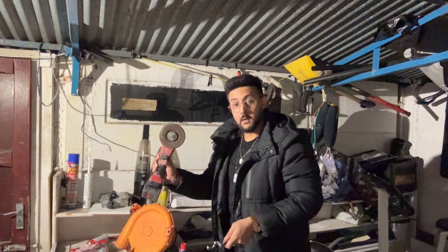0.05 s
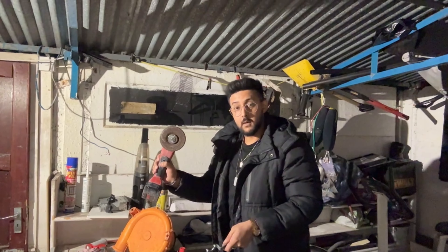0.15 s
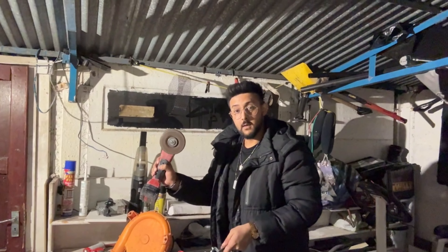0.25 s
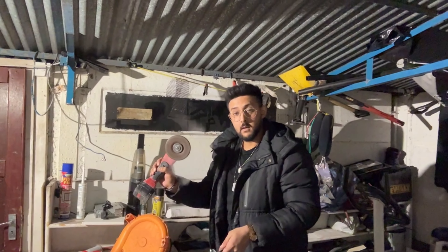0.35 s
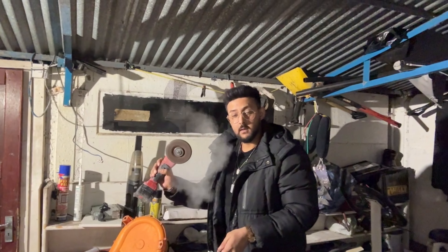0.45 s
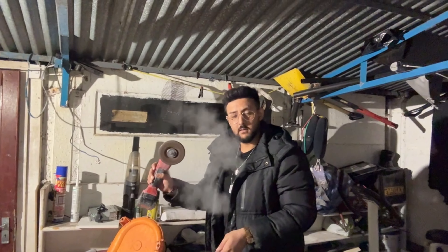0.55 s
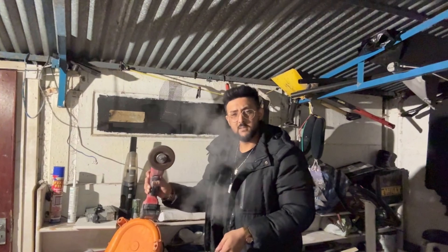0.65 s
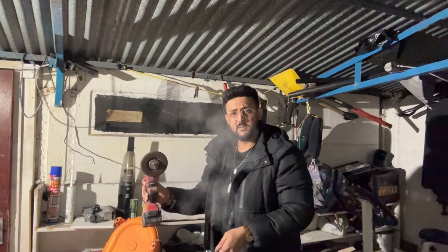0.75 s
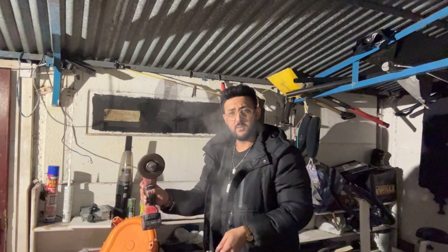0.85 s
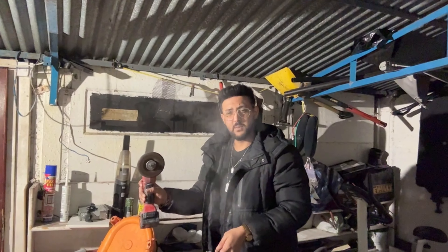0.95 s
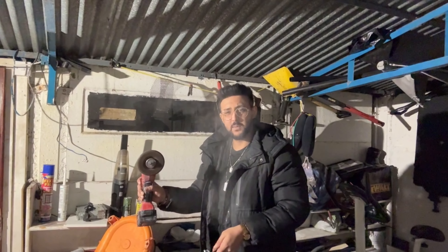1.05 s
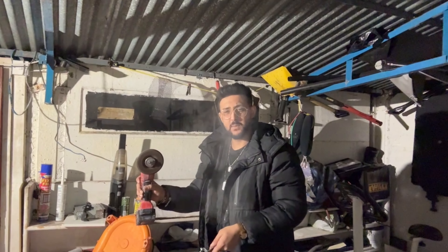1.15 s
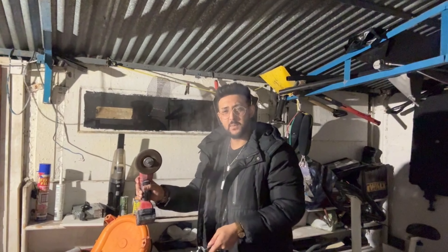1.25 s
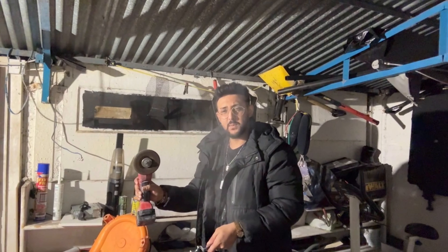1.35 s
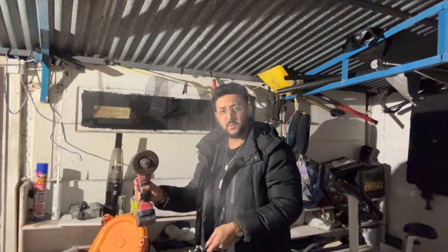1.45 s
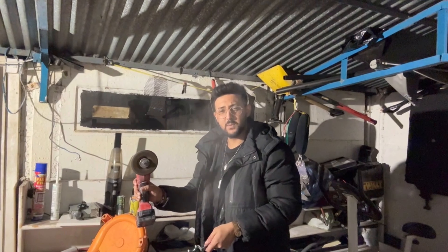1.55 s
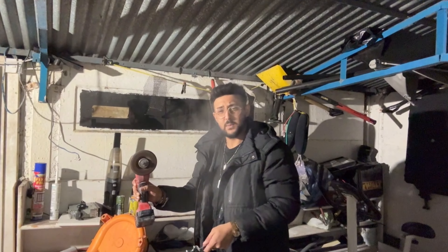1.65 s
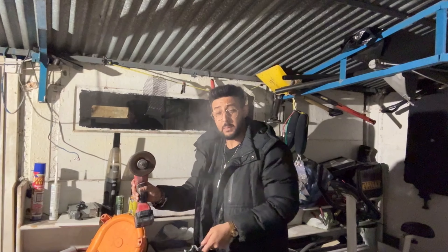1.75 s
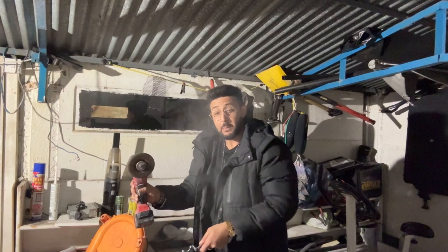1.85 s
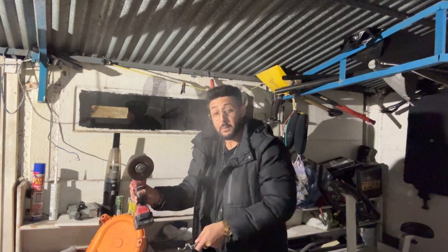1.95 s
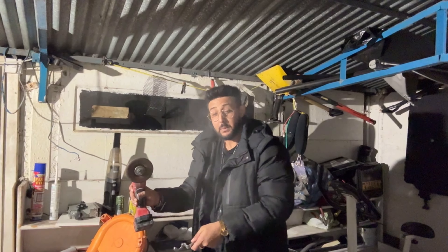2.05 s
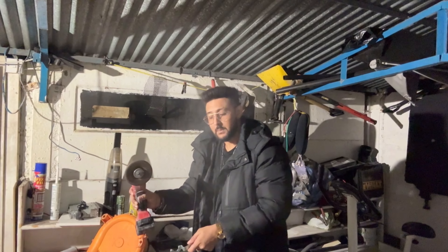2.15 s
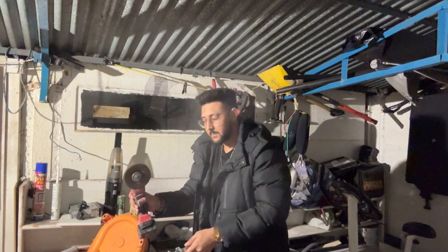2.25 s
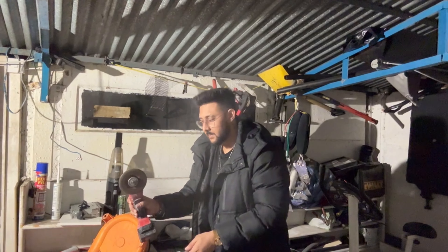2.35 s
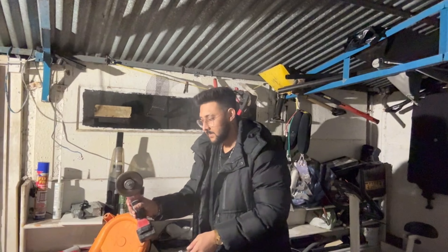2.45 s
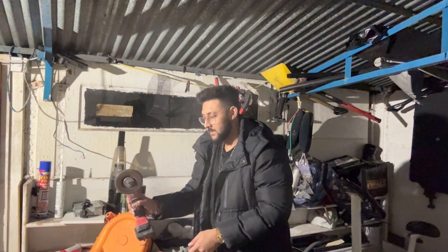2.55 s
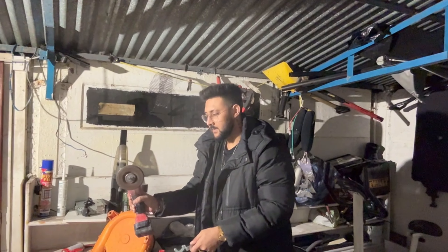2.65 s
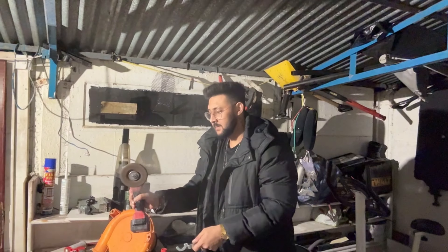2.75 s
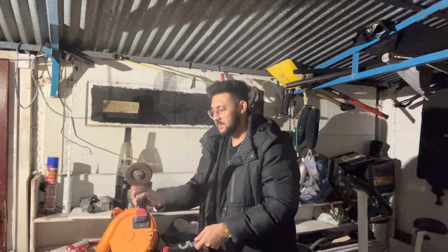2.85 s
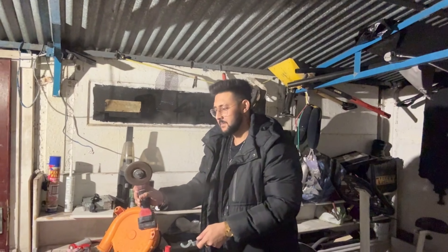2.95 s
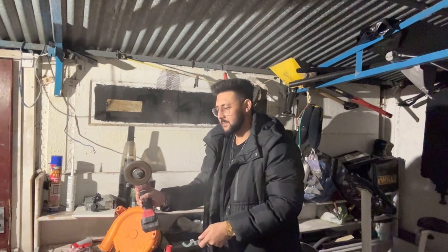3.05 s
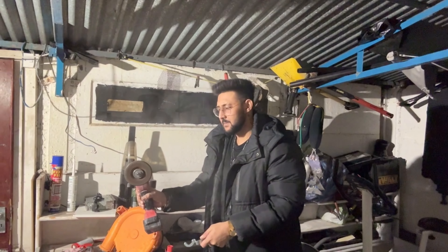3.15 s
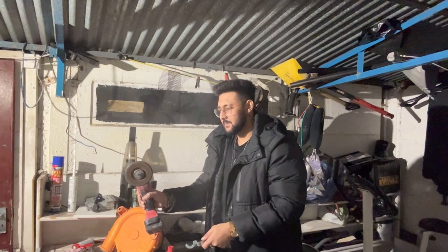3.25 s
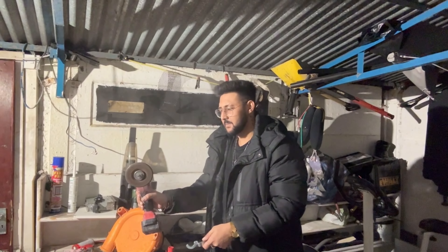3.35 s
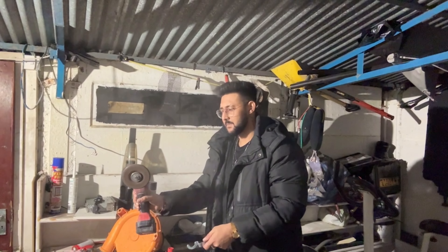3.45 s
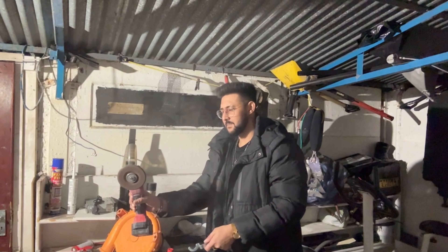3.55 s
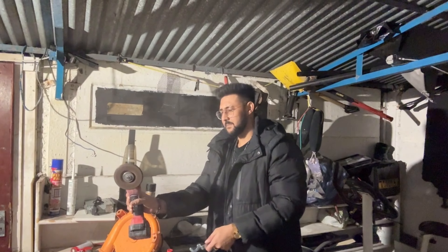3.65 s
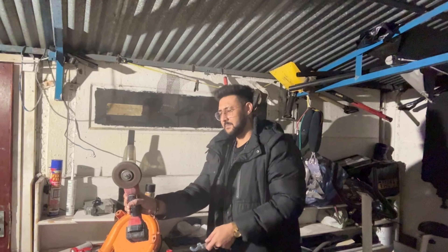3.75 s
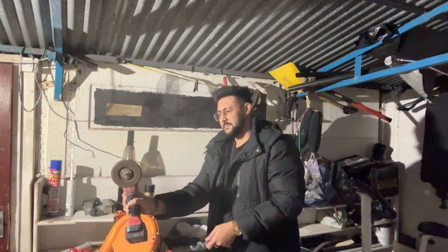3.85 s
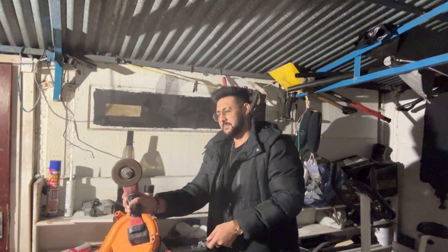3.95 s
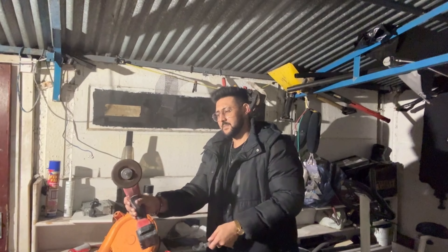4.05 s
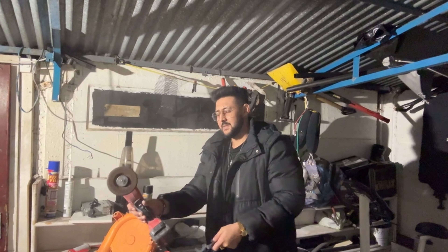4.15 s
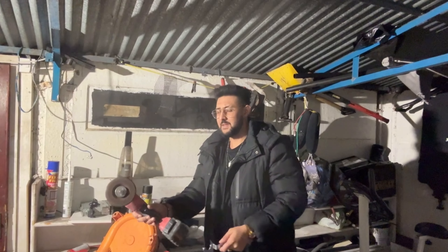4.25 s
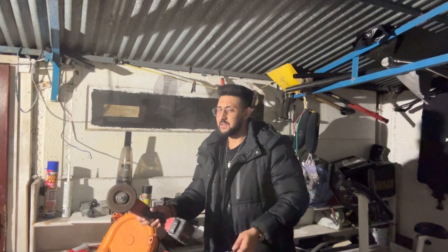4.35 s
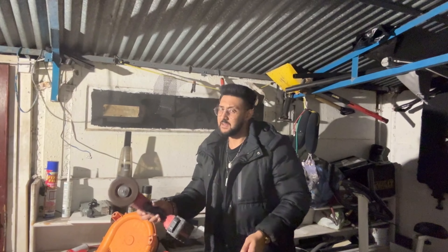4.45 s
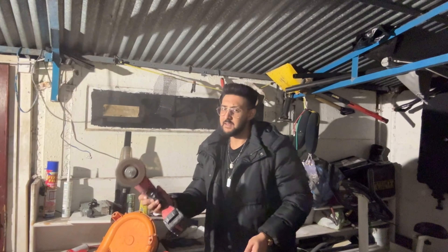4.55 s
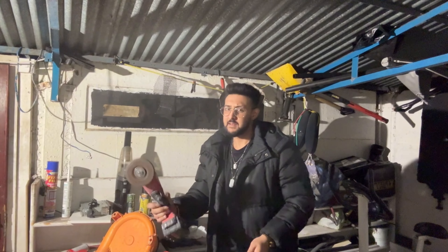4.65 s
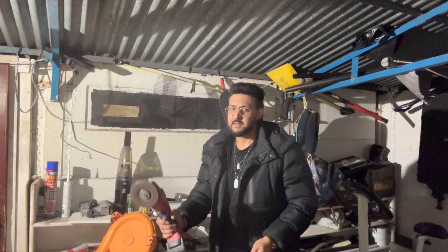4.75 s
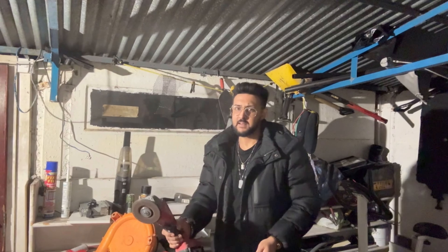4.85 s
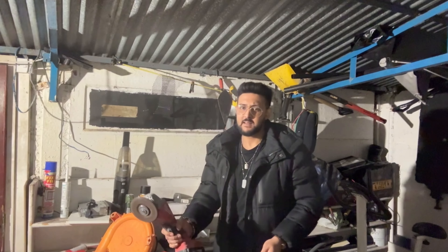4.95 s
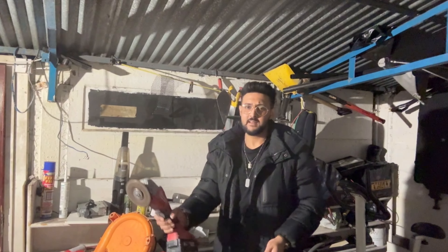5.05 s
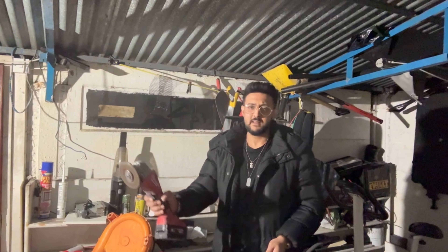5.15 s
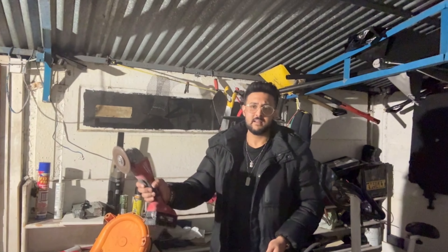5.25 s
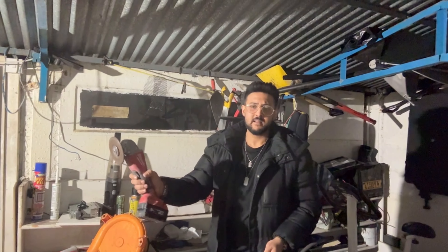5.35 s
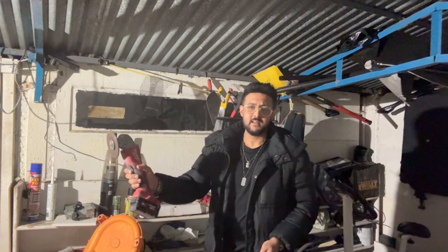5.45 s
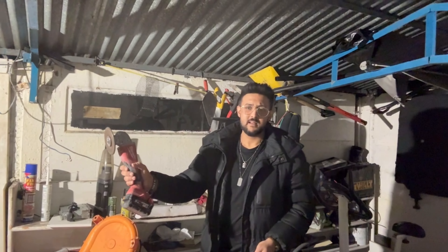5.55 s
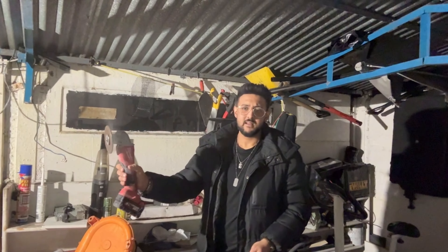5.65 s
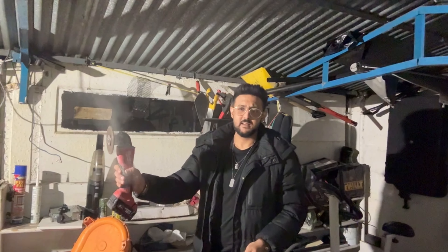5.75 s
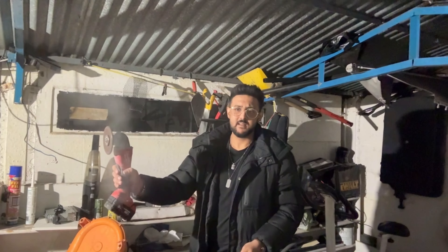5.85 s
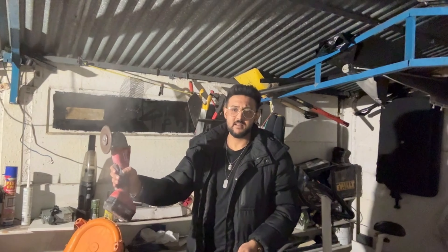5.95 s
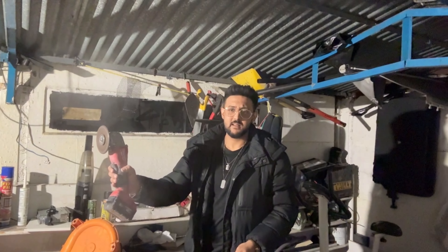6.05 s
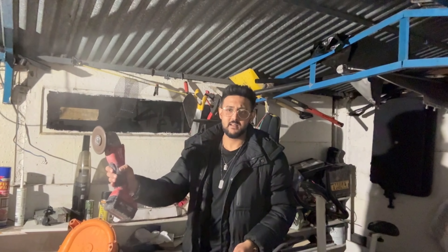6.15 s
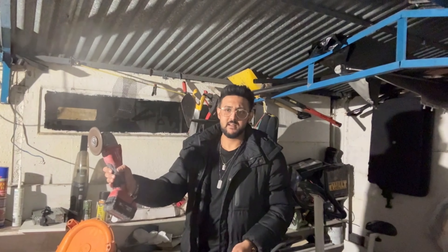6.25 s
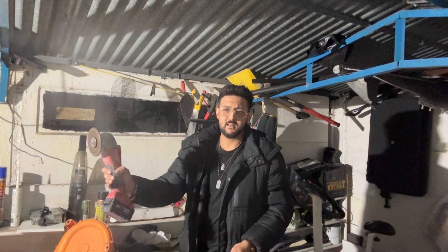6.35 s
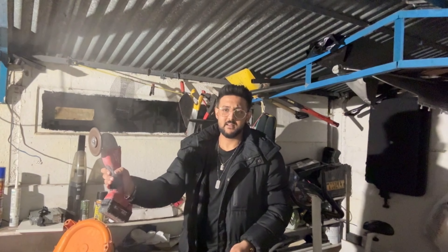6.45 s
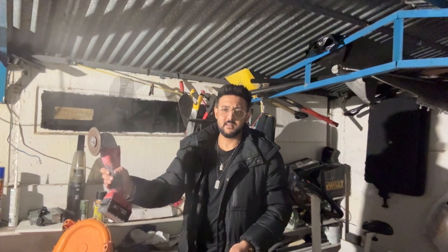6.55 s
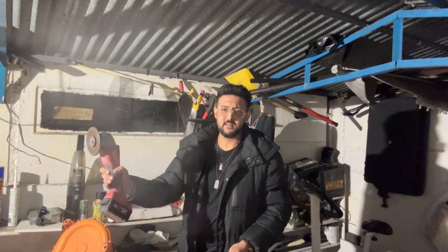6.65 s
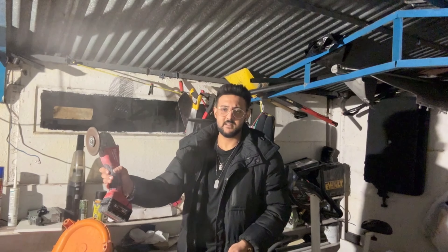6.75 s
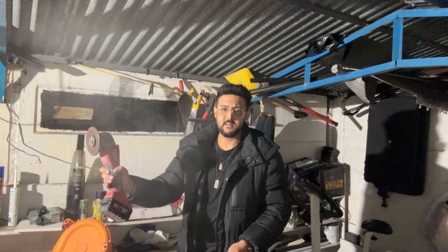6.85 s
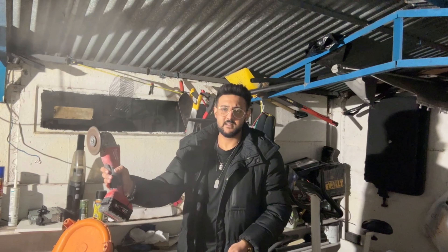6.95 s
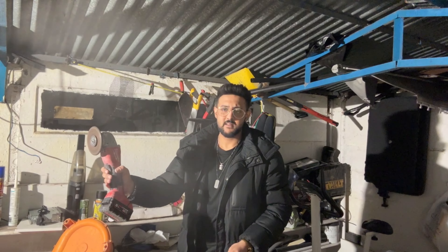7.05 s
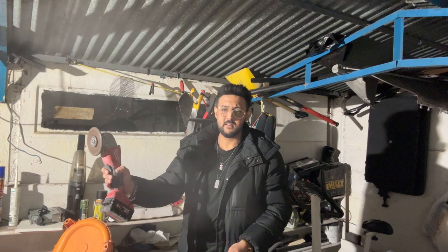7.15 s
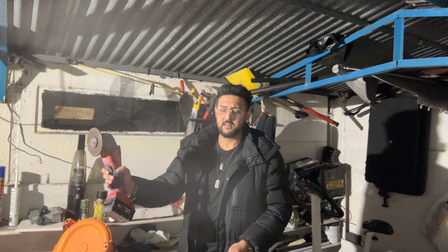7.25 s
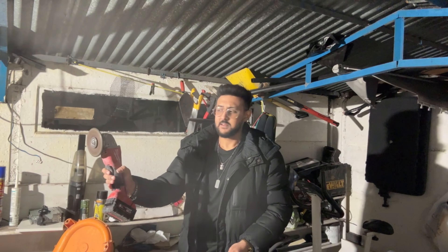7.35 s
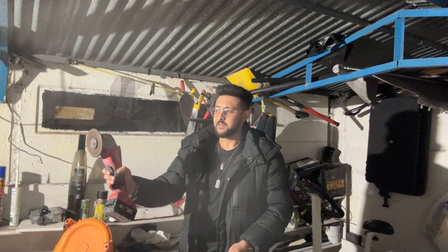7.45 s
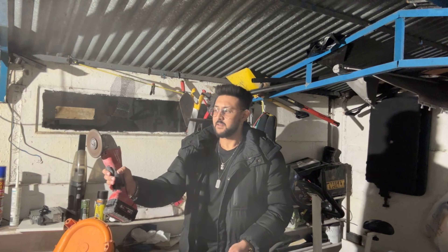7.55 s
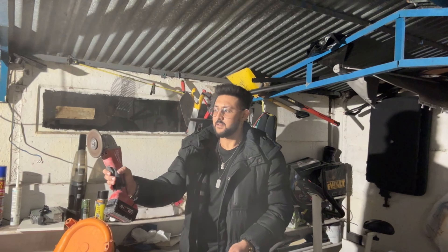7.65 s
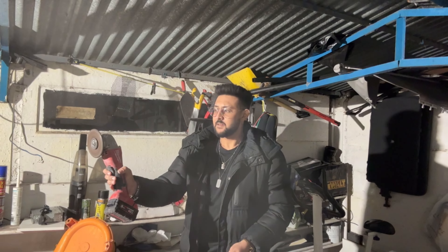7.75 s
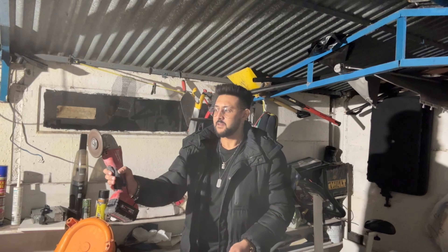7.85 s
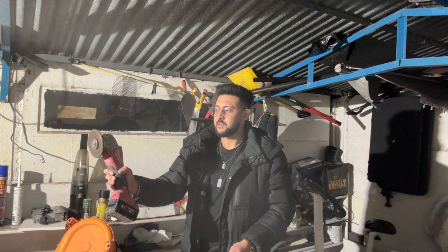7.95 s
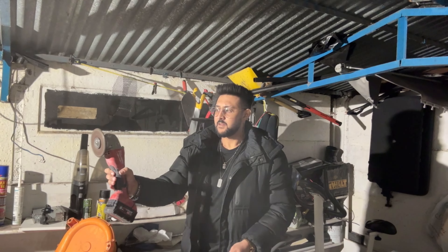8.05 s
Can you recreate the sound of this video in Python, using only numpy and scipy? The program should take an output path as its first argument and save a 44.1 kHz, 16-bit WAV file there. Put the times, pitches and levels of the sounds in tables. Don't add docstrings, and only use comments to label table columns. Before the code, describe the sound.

A quiet garage with low rumble; at 0.1 s a finger rubs faintly on plastic and a trigger gives way. At 0.2 s a cordless angle grinder growls and whirs up in a fraction of a second, gears whining roughly. From 0.4 to 2.6 s it coasts, pitch slowly sinking, with bright fluttering rattle, irregular hard metallic knocks, disc ringing, fan wind and gritty brush hiss; thin motor tones swell and fade. Short pulls at 2.6 and 3.2 s raise the whine again, the second higher, each followed by rattling rundown. A long coast sinks quieter until 5.5 s, when a stronger pull surges to 5.9 s. From 6.2 to 7 s comes the longest, fastest pull, high and steady, then a smoother, hissing coast. A last quick surge begins at 7.9 s and is still running at the end, around 8.1 s. Short hard-walled echo, fairly close microphone, no cutting.

```python
import sys
import numpy as np
from scipy import signal
from scipy.fft import rfft, irfft, next_fast_len
from scipy.io import wavfile

SR = 44100
rng = np.random.default_rng(int(sys.argv[2]) if len(sys.argv) > 2 else 0)


def makeup_ratio(level_db):
    decades = np.asarray(level_db, float) / 20
    return 10 ** decades


def wrap_up_sound(samples):
    columns = np.atleast_2d(samples).T
    tamed = np.clip(columns, -1, 1)
    steps = np.round(tamed * 32767).astype(np.int16)
    wavfile.write(sys.argv[1], SR, steps)


N = 356475
T = np.arange(N) / SR

DISC_RATIO, TEETH, POLES = .375, 10, 8
START_S = .195
UPRIGHT_S = 5.5
ENGAGE_S = 0.025


def evened(x):
    return x / np.sqrt(np.mean(x ** 2) + 1e-20)


def curve(rows, column=1):
    columns = np.transpose(rows)
    return np.interp(T, columns[0], columns[column])


def read(points, hz):
    f, value = np.transpose(points)
    return np.interp(np.log(hz + 1), np.log(f + 1), value)


def colour(x, points):
    size = next_fast_len(N)
    gain = makeup_ratio(read(points, np.fft.rfftfreq(size, 1 / SR)))
    return evened(irfft(rfft(x, size) * gain, size)[:N])


def wander(hz):
    return evened(signal.lfilter(*signal.butter(2, hz, fs=SR), rng.standard_normal(N)))


def lag(x, s):
    keep = np.exp(-1 / (s * SR))
    return signal.lfilter([1 - keep], [1, -keep], x)


def resonate(x, hz, width):
    r = np.exp(-np.pi * width / SR)
    angle = 2 * np.pi * hz / SR
    return signal.lfilter([1 - r * r], [1, -2 * r * np.cos(angle), r * r], x) * np.sin(angle)


def ring_modes(x, modes, widen=1):
    return sum(makeup_ratio(db) * evened(resonate(resonate(x, f, width), f, widen * width)) for f, width, db in modes)


def noise_db(hz, drive, push, full_db, per_doubling_db, drive_db, push_db):
    return full_db + per_doubling_db * np.log2(hz / 350) + drive_db * drive + push_db * push


# (frequency [Hz], level [dB per Hz])
RUMBLE_COLOUR = [(15, -34), (25, 7), (111, -5), (137, -12), (263, -25), (1130, -27), (1370, -28),
                 (1480, -29), (1790, -29), (4870, -43), (5880, -33), (13600, -46), (16000, -47)]
# (time [s], level [dB])
RUMBLE_LEVEL = [(0.18, -43.5), (0.31, -50.5), (2.5, -47), (4.5, -52), (8.08, -54)]


def room_rumble():
    return makeup_ratio(curve(RUMBLE_LEVEL)) * colour(rng.standard_normal(N), RUMBLE_COLOUR)


# (time [s], peak level [dB])
FINGER = [
    (.099, -42.5),
    (.12, -54),
    (.145, -59),
    (0.194, -35),
]


def finger_rub():
    rub = sum(makeup_ratio(db) * (T > s) * np.exp(-np.maximum(T - s, 0) / 0.024) for s, db in FINGER)
    noise = rng.standard_normal(N)
    plastic = resonate(resonate(noise, 3100, 1200), 2800, 1200) + 0.48 * resonate(noise, 4200, 900)
    return 2.4 * rub * plastic


def garage(x, t60=0.2):
    at = np.arange(250, SR // 2 - 20, 20)
    taps = np.zeros(SR // 2)
    taps[at + rng.integers(0, 20, len(at))] = rng.choice([-1., 1.], len(at)) * makeup_ratio(-60 * at / SR / t60)
    taps = signal.lfilter([1], [1, -.5], taps)
    return signal.oaconvolve(x, taps / np.linalg.norm(taps))[:N]


# (on [s], off [s], shaft speed aimed at [Hz], spin-up time [s], softness of the start [power])
PULLS = [
    (.195, .41, 294.5, .103, 2.0),
    (2.632, 2.85, 334, .105, 1.8),
    (3.245, 3.485, 378.6, .118, 1.7),
    (5.515, 5.914, 387, .137, 1.46),
    (6.23, 6.985, 419, .2, 1.08),
    (7.93, 8.2, 357.5, .071, 1.81),
]


def trigger():
    drag_per_s, friction_hz = .336, 68.8
    hz, aim = np.full(N, 30.0), np.ones(N)
    drive = np.zeros(N)
    for on, off, top_hz, rise, soft in PULLS:
        since, first = np.clip(T - on, 0, off - on), hz[round(on * SR)]
        driven = top_hz - (top_hz - first) * np.exp(-(since / rise) ** soft)
        slowing = np.exp(-drag_per_s * np.maximum(T - off, 0))
        coasting = (driven + friction_hz) * slowing - friction_hz
        hz, aim = np.where(T > on, coasting, hz), np.where(T > on, top_hz, aim)
        drive += np.clip((T - on) / 0.006, 0, 1) * np.exp(-np.maximum(T - off, 0) / .012)
    push = drive * np.clip(1 - hz / aim, 0, 1)
    return hz, drive, push


def chatter(turns):
    disc = DISC_RATIO * turns + .12 * wander(40)
    new_turn = np.diff(np.floor(np.maximum.accumulate(disc)), prepend=0) > 0
    hits = new_turn * makeup_ratio(4.3 * np.minimum(rng.exponential(1, N), 2.5))
    hits += (rng.random(N) < 150 / SR) * makeup_ratio(2.9 * np.minimum(rng.exponential(1, N), 3) - 5.0)
    t = np.arange(600) / SR
    burst = (1 - np.exp(-t / .0003)) * np.exp(-t / .0022)
    return evened(signal.oaconvolve(hits, burst)[:N])


# (frequency [Hz], level [dB per Hz])
AIR = [(88, -45), (150, -31), (205, -38), (304, -8), (375, -4), (407, 0.5), (446, -8.5), (662, -2),
       (1410, 2.5), (1640, 2), (2400, -0.5), (3120, -24), (5280, -120)]
# (frequency [Hz], width [Hz], level [dB])
VENTS = [(329.6, 39.6, -18.5), (524.5, 37, -13), (684, 37, -12.5)]
# (time [s], turned to the listener [dB], gear slack [dB])
HOLD = [(.2, 3, 6.5), (.5, 0.5, -2.5), (.85, 4, 0.5), (1.3, 4, 2.5), (1.8, 2.5, 4.5), (2.0, 3.5, 2.5),
        (2.6, 2, 2.5), (3.0, 2, -1), (3.4, 3.5, -2), (3.9, 2, -1), (4.5, -0.5, -0.5), (5.0, -1, -2.5),
        (5.5, -0.5, -1.5), (5.7, 2.5, -1.5), (6.2, 2, 0), (7.0, 1.5, -5), (7.4, 0, -1.5), (8.08, 0, -1.5)]


def fan_wind(hz, drive, push):
    gust = rng.standard_normal(N)
    wind = colour(gust, AIR) + ring_modes(gust, VENTS)
    level = noise_db(hz, drive, push, full_db=-35.5, per_doubling_db=7, drive_db=0, push_db=-1.5)
    return wind * makeup_ratio(level + 0.96 * curve(HOLD) + 1.0 * wander(17))


# (frequency [Hz], level [dB per Hz])
HISS = [(880, -27), (1500, -15), (1640, 0.5), (2250, -8.5), (2460, 1), (3010, 2), (4010, 2.5), (6080, 5),
        (6920, -9.5), (8790, -4.5), (10200, -3.5), (14200, -8), (15500, -12), (16100, 0)]


def brush_hiss(turns, hz, drive, push):
    grit = rng.standard_normal(N) * (3.0 + chatter(turns))
    level = noise_db(hz, drive, push * drive, full_db=-27.5, per_doubling_db=3.5, drive_db=2.5, push_db=11.5)
    return colour(grit, HISS) * makeup_ratio(level + curve(HOLD) + 1.5 + 1.0 * wander(15.0))


# (frequency [Hz], width [Hz], level [dB])
DISC = [(1782, 28, -9), (1853, 75, 2.5), (1981, 74, 15), (2117, 28, 8.5), (2593, 26, 3.5), (2844, 21, -4.5),
        (3750, 100, 9), (6200, 210, 3.5)]


def disc_ring(shake, hz, pressed, push, slack_db):
    ring = evened(sum(makeup_ratio(db) * evened(resonate(shake, f, width)) for f, width, db in DISC))
    ring = signal.sosfilt(signal.butter(4, 1500, "high", fs=SR, output="sos"), ring)
    level = noise_db(hz, pressed, push, full_db=-30.5, per_doubling_db=1, drive_db=-7.5, push_db=12)
    hold_db = 0.77 * slack_db + 0.2 * curve(HOLD) - 1.04 * (T > UPRIGHT_S)
    return ring * makeup_ratio(level + hold_db + 1.47 * wander(9.6))


# (frequency [Hz], level [dB per Hz])
RATTLE = [(4120, -27.5), (7000, -16), (7480, -53), (9340, 0), (9700, -9), (10100, 2), (11100, -9),
          (11800, -10.5), (14100, -13), (15600, -59), (16200, -36)]
# (frequency [Hz], width [Hz], level [dB])
CASE = [(8950, 780, -10), (9890, 210, 2), (10430, 420, -1.5), (12700, 160, -19), (13650, 250, -22)]


def case_rattle(shake, hz, pressed, push, slack_db):
    rattle = evened(colour(shake, RATTLE) + makeup_ratio(-6.5) * evened(ring_modes(shake, CASE, widen=3)))
    level = noise_db(hz, pressed, push, full_db=-23, per_doubling_db=5.5, drive_db=-9.5, push_db=0)
    return rattle * makeup_ratio(level + slack_db + 1.0 * wander(2.2) + 0.5)


# (time [s], peak level [dB])
KNOCKS = [(0.6023, -8), (0.7257, -20), (0.8388, -7), (0.849, -3), (0.883, -4.5), (0.972, -15),
          (1.0056, -6.5), (1.064, -10), (1.198, -5.5), (1.2618, -6), (1.3134, -3.5), (1.5364, -7),
          (1.752, -4.5), (1.8337, -6), (1.852, -7), (1.937, -13), (2.16, -8), (2.413, -12), (2.8378, -2),
          (2.9924, -6), (3.1826, -5), (3.2101, -4.5), (3.5134, -12), (3.5866, -7), (3.6675, -14),
          (3.7216, -7), (3.7847, -5), (4.2103, -9)]


def tooth_knocks(drive):
    t, knocks = np.arange(500) / SR, np.zeros(N)
    shape = (1 - np.exp(-t / 0.0003)) * np.exp(-t / 0.0014)
    blows = list(KNOCKS)
    for place, strength in rng.random((44, 2)):
        s = .5 + 2.2 * place
        blows.append((s, -14 + 4 * strength - 30 * drive[round(s * SR)]))
    for (s, db), (*pitch, share) in zip(blows, rng.uniform(0.93, 1.03, (len(blows), 5))):
        low_db = -13 + 300 * (share - 1)
        mode_hz = (.6 + .4 * np.array(pitch)) * [9930, 10480, 13200, 2180]
        clang = [1, .35, .15, makeup_ratio(low_db)] @ np.sin(2 * np.pi * np.outer(mode_hz, t))
        knocks[round(s * SR):][:500] += makeup_ratio(db) * shape * clang
    return 1.6 * knocks


def loose_gears(turns, hz, drive, push):
    closed = lag(drive, 0.45)
    slack_db = curve(HOLD, 2) + 2.5 * np.maximum(closed - drive, 0)
    loose = np.interp(T, [UPRIGHT_S - .1, UPRIGHT_S + 0.08], [.8, .4])
    shake = rng.standard_normal(N) * (0.78 + loose * chatter(turns))
    state = shake, hz, closed * drive, push, slack_db
    return case_rattle(*state) + disc_ring(*state) + tooth_knocks(drive)


def order_tone(order, turns):
    return np.sqrt(2) * np.cos(2 * np.pi * order * turns)


# (frequency [Hz], level [dB])
HOUSING = [(40, -8), (150, -15.5), (230, -31.5), (330, -4.5), (450, -5), (560, -0.5), (850, -7), (1050, -1),
           (1700, -8)]
ORDERS = [.375, 1, 2, 3, 4]
ORDER_LEVELS = [-50, -52, -52, -58, -48]


def shaft_tones(turns, hz):
    out = np.zeros(N)
    for k, db in zip(ORDERS, ORDER_LEVELS):
        out += makeup_ratio(db + 2.5 * wander(10) + read(HOUSING, k * hz)) * order_tone(k, turns + rng.random() / k)
    return out * np.clip(hz / 220, 0, 1) * (T > START_S) * makeup_ratio(1.03 * curve(HOLD))


# (on [s], off [s], multiple of shaft speed [ratio], level [dB])
GLEAMS = [(1.76, 1.97, 20, -36), (2.03, 2.63, 12, -47), (2.2, 2.64, 28, -40), (4.2, 4.5, 10.6, -41),
          (4.55, 4.85, 16, -41), (7.07, 7.14, 8, -35), (5.15, 5.42, 16, -41), (1.05, 1.48, 16, -38),
          (5.9, 6.03, 8, -37), (3.48, 3.64, 8, -41), (.55, 1.1, 4, -45), (1.5, 1.8, 4, -48),
          (6.45, 7.05, 1, -51), (.45, .9, 2, -50), (3.25, 3.75, 2, -48), (3.6, 4.5, 4, -49)]


def gleams(turns):
    out = np.zeros(N)
    for on, off, k, db in GLEAMS:
        swell = np.clip(np.minimum(T - on, off - T) / 0.013, 0, 1)
        out += swell * makeup_ratio(db + 4 + 3.3 * wander(33)) * np.cos(2 * np.pi * k * turns)
    return out


# (frequency [Hz], level [dB])
HUM = [(900, -67.5), (1600, -64), (2000, -17.5), (2280, -34), (2650, -32), (2970, -20), (3150, -22),
       (3320, -29.5)]
# (frequency [Hz], level [dB])
OCTAVE = [(1400, -66), (2050, -75), (2650, -49), (3000, -19.5), (3250, -15.5), (3550, -24), (3900, -48),
          (4600, -56)]


def magnet_hum(turns, hz, drive, idle):
    hum_db = read(HUM, POLES * hz) - 23 * idle + 1.2 * wander(20)
    octave_db = read(OCTAVE, 2 * POLES * hz) - 18 * idle + 2.4 * wander(21)
    octave = order_tone(2 * POLES, turns + .004 * drive * wander(150))
    return makeup_ratio(hum_db) * order_tone(POLES, turns) + makeup_ratio(octave_db) * octave


def switching(push):
    return makeup_ratio(-45) * push ** 3 * np.cos(2 * np.pi * 8050 * T)


# (frequency [Hz], width [Hz], level [dB])
GEARBOX = [(1156, 28, -25), (2030, 270, -31.5), (3140, 500, 0), (5980, 460, 4), (6660, 510, 2)]
# (shaft speed [Hz], level [dB])
GRIND = [(32, -33), (43, -19), (110, -20), (200, -27.5), (250, -33), (320, -30), (390, -47)]


def tooth_grind(wobble, throb, hz, drive):
    overtones = order_tone(2 * TEETH, wobble) + 0.93 * order_tone(3 * TEETH, wobble)
    grind = rng.standard_normal(N) + 2.3 * overtones
    return evened(ring_modes(grind, GEARBOX)) * throb * makeup_ratio(read(GRIND, hz)) * drive


# (frequency [Hz], level [dB])
MESH = [(700, -60), (1030, -31), (1300, -32.5), (2000, -20), (2500, -21), (3100, -25), (3600, -22),
        (4050, -23)]


def mesh_whine(wobble, throb, hz, drive, push, idle):
    upright_db = -4 * (T > UPRIGHT_S)
    level = makeup_ratio(read(MESH, TEETH * hz) - 22 * idle + 15.5 * push + upright_db)
    level *= np.clip((455 - hz) / 60, 0, 1)
    level *= np.clip(np.maximum(lag(drive, ENGAGE_S) + idle, 0.73 * push), 0, 1)
    octave = 0.16 * order_tone(2 * TEETH, wobble) * (hz < 320)
    return level * throb * (order_tone(TEETH, wobble) + octave)


def motor(turns, hz, drive, push):
    idle = 1 - np.minimum(drive, 1)
    wobble = turns + .015 * wander(180)
    throb = 1 + .4 * np.cos(2 * np.pi * DISC_RATIO * turns) + .25 * np.cos(2 * np.pi * turns)
    throb += .45 * wander(70)
    out = shaft_tones(turns, hz) + gleams(turns) + magnet_hum(turns, hz, drive, idle) + switching(push)
    out += tooth_grind(wobble, throb, hz, drive)
    return out + mesh_whine(wobble, throb, hz, drive, push, idle)


def scene():
    hz, drive, push = trigger()
    turns = np.cumsum(hz) / SR
    start = np.clip((T - START_S) / 0.077, 0, 1) ** 1.36
    felt = lag(drive, ENGAGE_S)
    air = fan_wind(hz, felt, push) + brush_hiss(turns, hz, felt, push)
    noises = start * (air + loose_gears(turns, hz, drive, push))
    tones = motor(turns, hz, drive, push)
    wet = makeup_ratio(-9) * garage(tones + makeup_ratio(-4.0) * noises)
    return (makeup_ratio(-1.5) * (tones + noises) + wet + room_rumble() + finger_rub())[None]


def top_cut(x):
    return signal.sosfilt(signal.butter(12, 16750, fs=SR, output="sos"), x)


def record(dry):
    thin = signal.sosfilt(signal.butter(8, 44, "high", fs=SR, output="sos"), dry)
    rounded = np.tanh(1.2 * thin) / 1.2
    band_limit = signal.firwin(401, 15900, window=("kaiser", 9), fs=SR)
    mix = signal.oaconvolve(rounded, band_limit[None], "same")
    return top_cut(mix)


dry = scene()
out = record(dry)
wrap_up_sound(out)
```